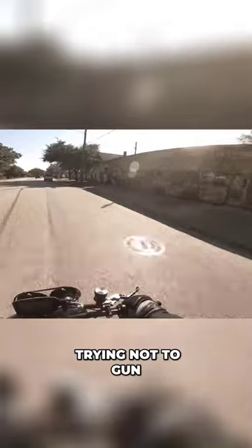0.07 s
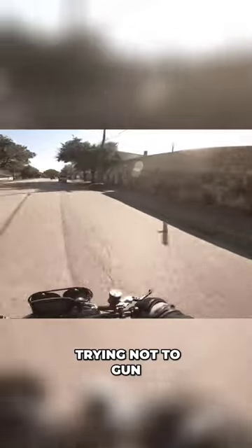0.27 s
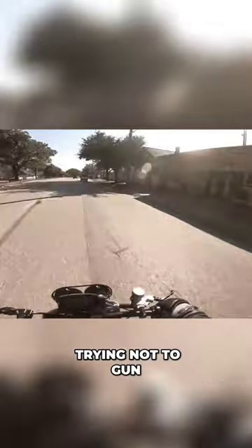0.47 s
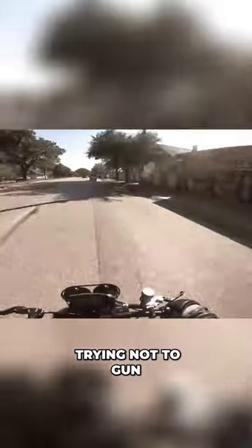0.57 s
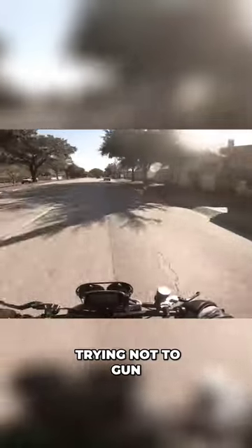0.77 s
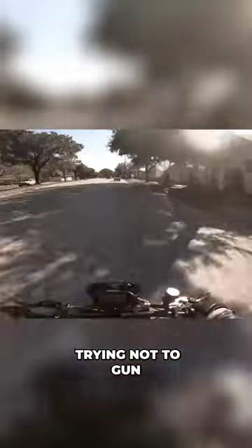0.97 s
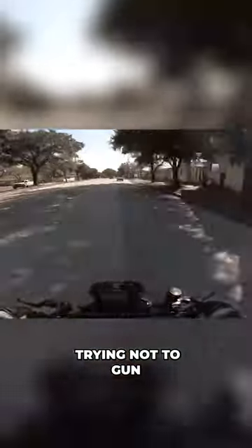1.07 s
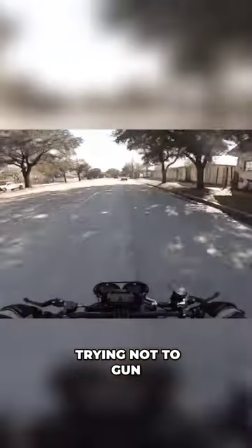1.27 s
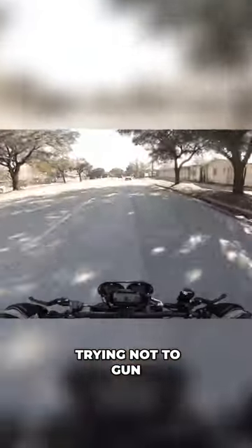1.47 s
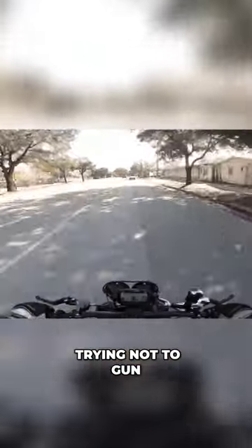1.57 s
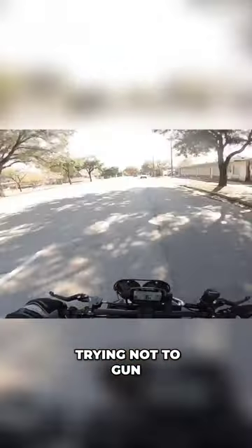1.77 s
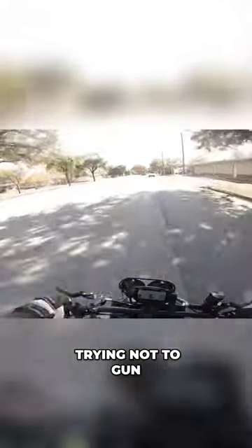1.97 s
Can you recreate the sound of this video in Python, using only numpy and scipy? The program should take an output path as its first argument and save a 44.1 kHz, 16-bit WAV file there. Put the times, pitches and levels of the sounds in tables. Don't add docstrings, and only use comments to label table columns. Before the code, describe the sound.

After a tiny silence, a small motorbike engine cuts in and cruises along a street, its rapid dull exhaust pulses softening then brightening, while gusts buffet the close onboard microphone and a brief roadside hiss passes.

```python
import sys
import numpy as np
from scipy import signal
from scipy.io import wavfile
from scipy.ndimage import uniform_filter1d

SR = 44100
rng = np.random.default_rng(int(sys.argv[2]) if len(sys.argv) > 2 else 0)


def invert_db(level):
    return 10 ** (np.asarray(level, dtype=float) / 20)


def log_audio(samples):
    frames = np.atleast_2d(samples).T
    limited = np.clip(frames, -1, 1)
    pcm = np.round(limited * 32767).astype(np.int16)
    wavfile.write(sys.argv[1], SR, pcm)


N = 89214
TIME = np.arange(N) / SR

# (time [s], exhaust level [dB], throttle brightness [dB])
ENGINE_LOAD = [
    (.1, 2.5, 4.5),
    (.2, -4.5, -1.5),
    (.45, -1.5, -3),
    (.7, -7, 1),
    (.95, -1, -0.5),
    (1.15, 0.5, 2.5),
    (1.35, 1.5, 2.5),
    (1.5, 1.5, 3),
    (2.03, -.5, 3),
]


def level(x, db):
    return x * invert_db(db) / np.sqrt(np.mean(x ** 2))


def curve(table, column=1):
    rows = np.array(table, float)
    return np.interp(TIME, rows[:, 0], rows[:, column])


def band(x, hz, width):
    return signal.lfilter(*signal.iirpeak(min(hz, .45 * SR), hz / width, fs=SR), x)


def noise(hz, width):
    once = band(rng.standard_normal(N), hz, width)
    return level(band(once, hz, width), 0)


def walk(rate):
    hold = int(SR / rate)
    steps = np.repeat(rng.standard_normal(N // hold + 1), hold)
    return 1.23 * uniform_filter1d(uniform_filter1d(steps, hold), hold)[:N]


def bump(x, centre, width):
    return np.exp(-.5 * ((x - centre) / width) ** 2)


def nearest_firing(cycles, hz):
    firing = np.round(cycles).astype(int)
    return firing, 1000 * (cycles - firing) / hz


def exhaust(cycles, hz):
    # (delay [ms], width [ms], peak [dB], share of load [0-1])
    suction_blows = [
        (-1.33, .45, -2, 1),
        (-3.45, .45, -18, .3),
        (9, 1.1, -17, 0),
    ]
    firing, ms = nearest_firing(cycles, hz)
    load_db = curve(ENGINE_LOAD)
    scatter_db = (1.1 - .35 * load_db) * rng.standard_normal((200, 3))[firing].T

    blows = 0
    for (lag, width, db, share), uneven_db in zip(suction_blows, scatter_db):
        blows = blows - invert_db(db + share * load_db + uneven_db) * bump(ms, lag, width)
    ripple_db, silencer_hz, bass_cut_hz = 3.5, 443, 65
    pipe = signal.lfilter(*signal.cheby1(4, ripple_db, silencer_hz, fs=SR), blows)
    tailpipe = invert_db(-11.5) * band(pipe, 413, 44)
    front = invert_db(-9.5 + load_db + scatter_db[0]) * bump(ms, -1.264, 0.51)
    return signal.lfilter(*signal.butter(1, bass_cut_hz, "high", fs=SR), pipe + tailpipe + front)


def valve(cycles, hz):
    # (frequency [Hz], width [Hz], level [dB], gain per dB of brightness [dB/dB])
    head_modes = [
        (635, 55, 9, .1),
        (945, 85, 8, 1.6),
        (1390, 100, 5, 1.1),
        (2200, 500, 4, 1.1),
        (510, 50, 3, 1.5),
    ]
    firing, ms = nearest_firing(cycles, hz)
    scatter_db = 1.5 * rng.standard_normal(200)[firing]
    rap = -invert_db(-23 + scatter_db) * bump(ms, -2.5, .22)
    brightness_db = curve(ENGINE_LOAD, column=2)
    out = rap
    for mode_hz, width, db, gain in head_modes:
        out = out + invert_db(db + gain * brightness_db) * band(rap, mode_hz, width)
    return out


def crank(cycles):
    lag = -.026
    size = np.sqrt(2) * invert_db(-22 + 2 * walk(9.86))
    return -size * np.cos(4 * np.pi * (cycles - lag))


def clatter(cycles, hz):
    # (from [Hz], to [Hz], level [dB], bursts [per cycle], lag [cycles], decay [ms])
    loose_parts = [
        (772, 1613, -53, 1, -0.064, 5.6),
        (1398, 4520, -54, 1, -0.064, 4.3),
        (1610, 4050, -57.5, 2, -0.1, 7.8),
        (4060, 8020, -61, 2, -.1, 9.3),
        (7980, 12400, -66.5, 2, -0.13, 5.1),
        (12500, 18000, -75, 2, -.1, 3),
    ]
    rise_ms, scatter_db, relative_width = 0.89, 5.5, 0.053 * 2
    out = 0
    for lo_hz, hi_hz, db, count, lag, decay_ms in loose_parts:
        beat = count * (cycles - lag)
        ms = 1000 * (beat % 1) / count / hz
        gate = np.exp(-ms / decay_ms) * (1 - np.exp(-ms / rise_ms))
        parts = 0
        for part_hz in np.geomspace(lo_hz, hi_hz, num=9)[:-1]:
            width = part_hz * relative_width
            size = invert_db(scatter_db * rng.uniform(-1.7, 1.7, size=400))[beat.astype(int)]
            struck = size * gate * noise(part_hz, width)
            parts = parts + band(struck, part_hz, width) * lo_hz / part_hz
        out = out + level(parts, db)
    return out * invert_db(curve(ENGINE_LOAD, column=2))


def tappet(cycles):
    # (time [s], level [dB])
    ping_level = [
        (.1, -71),
        (.9, -71),
        (1.2, -66),
        (1.45, -63),
        (1.75, -62),
        (2.03, -65),
    ]
    ping_hz, width_hz, lag = 5260, 75, .4
    struck = np.diff(np.floor(cycles - lag), prepend=0)
    struck = struck * invert_db(2 * rng.standard_normal(N)) * rng.choice([-1, 1], size=N)
    struck[0] = 0
    ping = band(band(struck, ping_hz, width_hz), ping_hz, 6 * width_hz)
    return level(ping, 0) * invert_db(curve(ping_level))


def whines(cycles):
    # (frequency [Hz], width [Hz], level [dB], from [s], to [s], throbs [per cycle])
    whistles = [
        (2360, 80, -56.5, .05, .55, 2),
        (2934, 90, -66, .8, 2.1, 1),
    ]
    out = 0
    for hz, width, db, start, end, count in whistles:
        pulse_db = 4 * np.cos(2 * np.pi * count * (cycles - .45))
        throb = invert_db(pulse_db + 0.5 * walk(43))
        fade = np.clip(np.minimum(TIME - start, end - TIME) / 0.067, 0, 1)
        out = out + throb * invert_db(db) * noise(hz, width) * fade
    return out


def air(spectrum, flicker_db, shared_db):
    rows, out = np.array(spectrum, float), 0
    for hz in 7.5 * 2 ** np.arange(0, 11.1, .5):
        if .9 * rows[0, 0] < hz < 1.1 * rows[-1, 0]:
            density_db = np.interp(np.log(hz), np.log(rows[:, 0]), rows[:, 1])
            db = density_db + 10 * np.log10(hz)
            out = out + invert_db(db + flicker_db * walk(11.56) + shared_db(hz)) * noise(hz, hz / 2)
    return level(out, 0)


def wind():
    # (time [s], level [dB])
    gust_level = [(.1, -7), (.2, -1.5), (.4, -3), (.56, -0.5), (.7, -1.5), (.85, -2), (1.0, -0.5),
                  (1.1, -1.5), (1.24, -1), (1.33, -3.5), (1.6, -2.5), (1.73, -2.5), (1.85, -3),
                  (2.02, -2.5)]
    # (frequency [Hz], density [dB per Hz])
    buffet_spectrum = [(8, 4.5), (14, 2), (30, -4.5), (60, -12), (150, -10), (300, -17), (600, -23.5),
                       (1400, -51)]
    rush_spectrum = [(500, -6.5), (1000, -1), (1600, -1.5), (2500, 3), (4000, -12.5), (8000, -20.5),
                     (12000, -33.5), (15500, -51)]
    gust, flap = curve(gust_level), walk(25.3)
    brightness_db = curve(ENGINE_LOAD, column=2)

    def rush_swell(hz):
        return brightness_db * min(hz / 6000, 1.5) + 0.9 * gust + .5 * flap

    buffet = air(buffet_spectrum, 2, lambda hz: gust)
    rush = air(rush_spectrum, 0.5, rush_swell)
    return invert_db(-16.5) * buffet + invert_db(-46.5) * rush


def swishes():
    # (peak [s], rise [s], fall [s], frequency [Hz], width [Hz], level [dB])
    kerb_hiss = [
        (.62, .03, .05, 12800, 2500, -68),
        (.69, .06, .05, 6200, 800, -58),
        (0.61, 0.033, .05, 5000, 6000, -58.5),
        (.11, .01, .04, 13000, 7000, -69),
    ]
    out = 0
    for peak, rise, fall, hz, width, db in kerb_hiss:
        swell = bump(TIME, peak, np.where(TIME < peak, rise, fall))
        out = out + invert_db(db) * noise(hz, width) * swell
    return out


def thumps():
    # (time [s], frequency [Hz], length [s], level [dB])
    eddies = [(0.135, 42.7, 0.013, -20), (0.391, 79.4, 0.029, -19), (0.414, 308, 0.024, -24),
              (0.48, 22, 0.042, -24), (.56, 174, 0.031, -20.5), (.625, 80.4, 0.015, -18.5),
              (0.876, 40, 0.017, -21), (.91, 175, 0.012, -17.5), (.76, 146.7, 0.075, -33),
              (1.39, 200.4, 0.026, -24), (1.0, 134.4, 0.024, -17), (0.99, 30.7, 0.023, -19),
              (1.096, 22.6, 0.023, -27), (1.167, 216, 0.018, -21.5), (1.182, 743, 0.0071, -27.5),
              (1.236, 131.5, 0.028, -19), (1.70, 162, 0.016, -18.5), (1.74, 28.4, 0.023, -19),
              (1.76, 79, 0.014, -23), (1.911, 30, 0.067, -17.5), (1.966, 30.5, 0.0083, -14.5)]
    out = 0
    for start, hz, length, db in eddies:
        since = TIME - start
        turns = hz * since * (1 - 1.08 * since) + rng.uniform()
        out = out + np.sqrt(2) * invert_db(db) * bump(since, 0, length) * np.cos(2 * np.pi * turns)
    return out


def scene():
    # (time [s], firing rate [per s])
    revs = [
        (.1, 40.81),
        (.3, 39.84),
        (.55, 39.14),
        (.8, 38.64),
        (1.08, 38.77),
        (1.3, 39.44),
        (1.5, 39.98),
        (1.75, 40.28),
        (2.03, 40.47),
    ]
    hz = curve(revs)
    cycles = np.cumsum(hz) / SR - .793 + 2
    engine = exhaust(cycles, hz) + valve(cycles, hz) + crank(cycles)
    engine = engine + clatter(cycles, hz) + tappet(cycles) + whines(cycles)
    return (engine + wind() + swishes() + thumps())[None]


def top_cut(x):
    return signal.sosfilt(signal.butter(12, 16290, fs=SR, output="sos"), x)


def record(dry):
    start_s, fade_s, end_fade_s, top_hz = .1035, .0007, .006, 15480
    fade_in = np.clip((TIME - start_s) / fade_s, 0, 1)
    fade_out = np.clip(TIME[::-1] / end_fade_s, 0, 1)
    limited = np.tanh(.8 * dry) / .8
    cut = signal.sosfilt(signal.ellip(10, .2, 70, top_hz, fs=SR, output="sos"), limited)
    return top_cut(cut * fade_in * fade_out)


dry = scene()
out = record(dry)
log_audio(out)
```